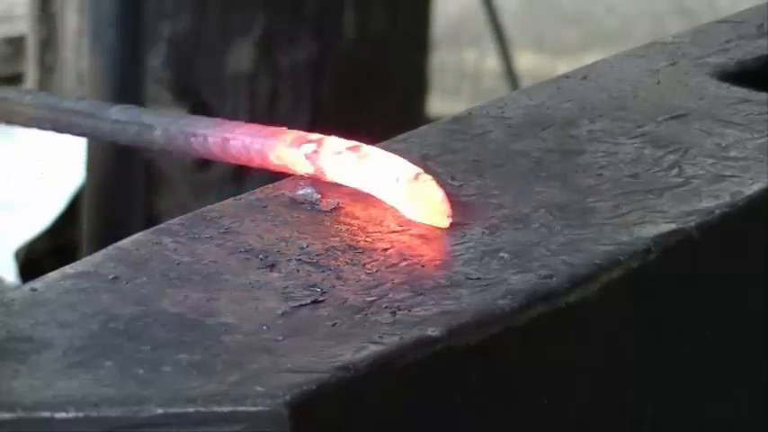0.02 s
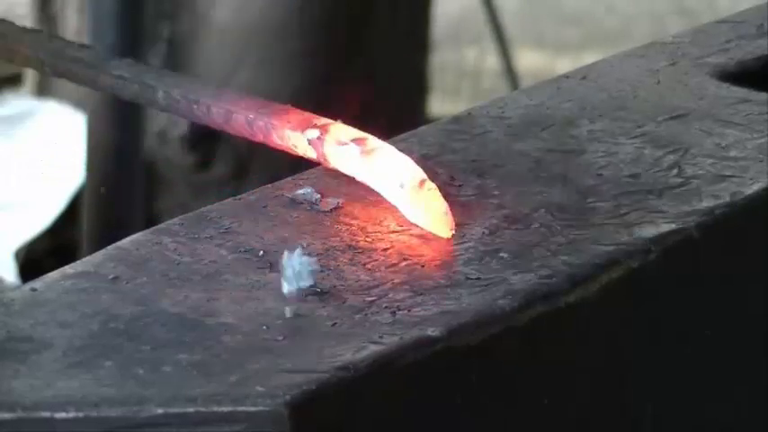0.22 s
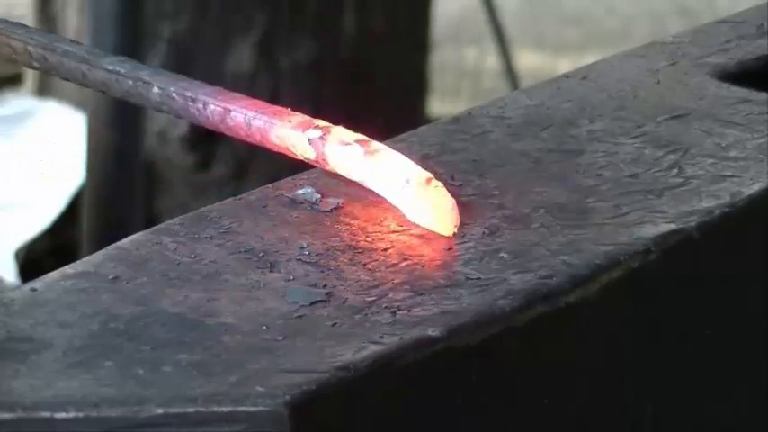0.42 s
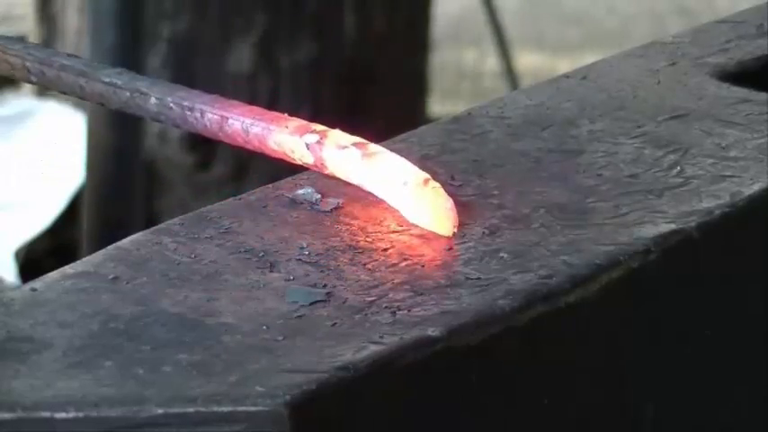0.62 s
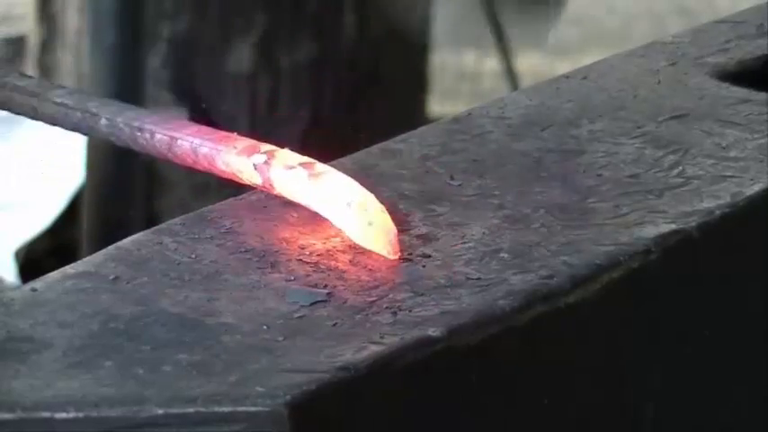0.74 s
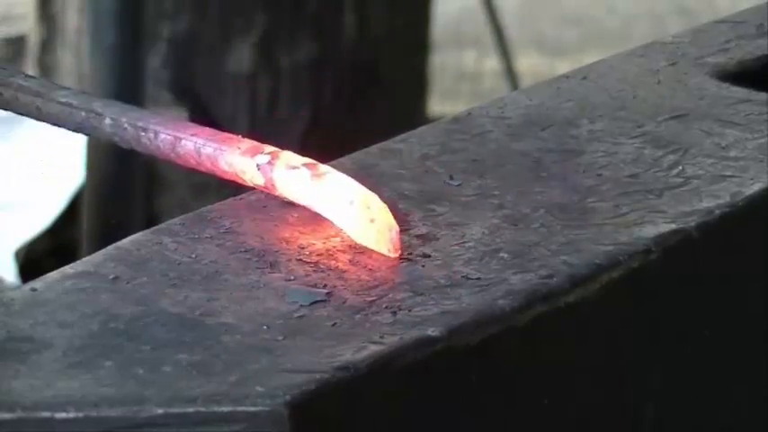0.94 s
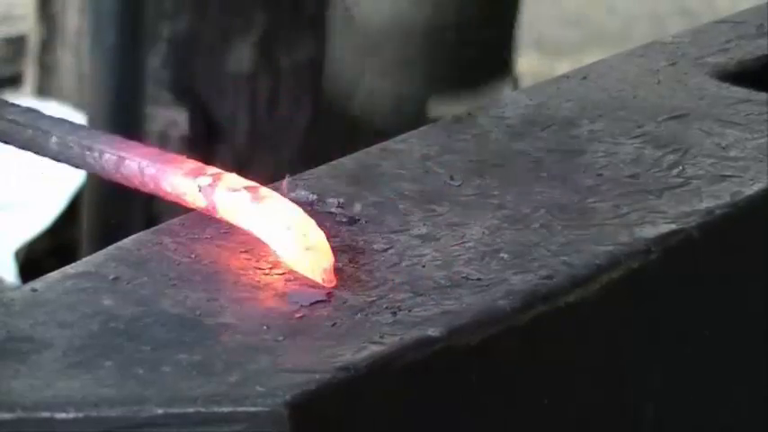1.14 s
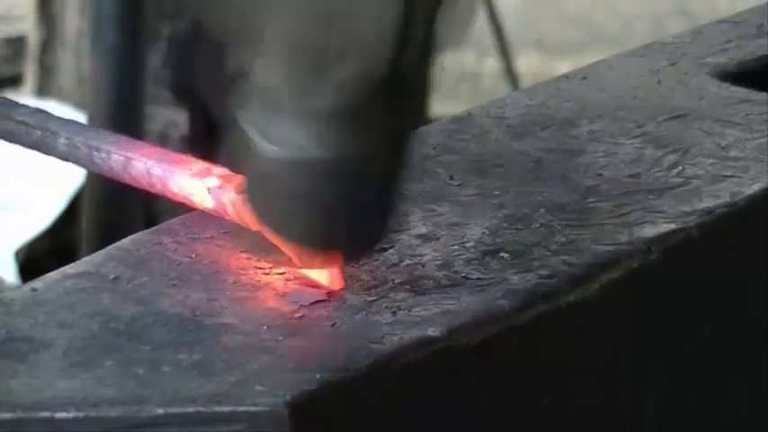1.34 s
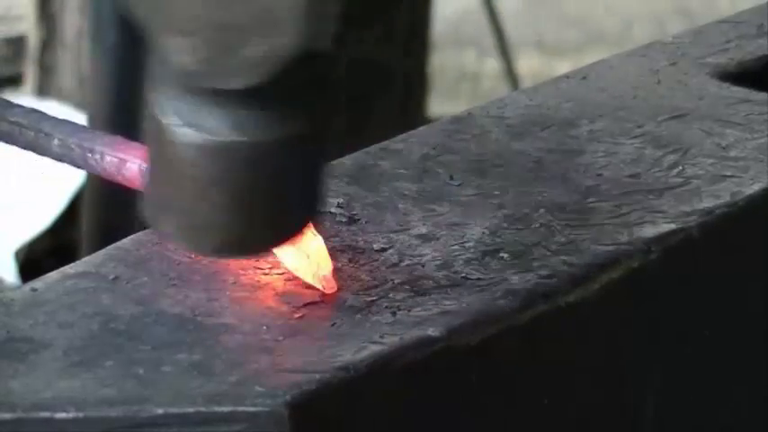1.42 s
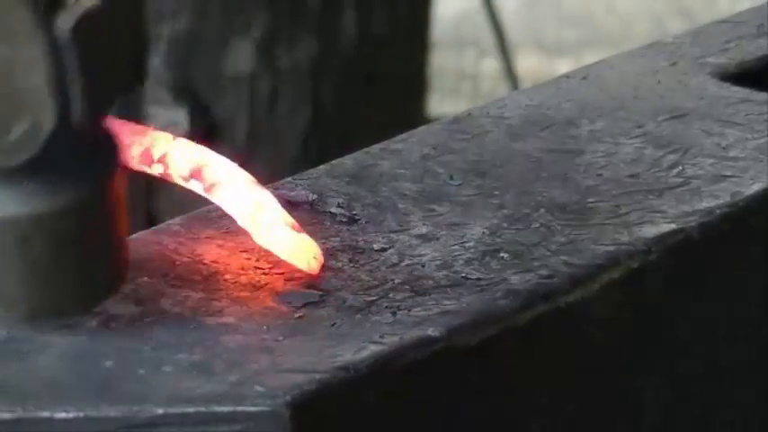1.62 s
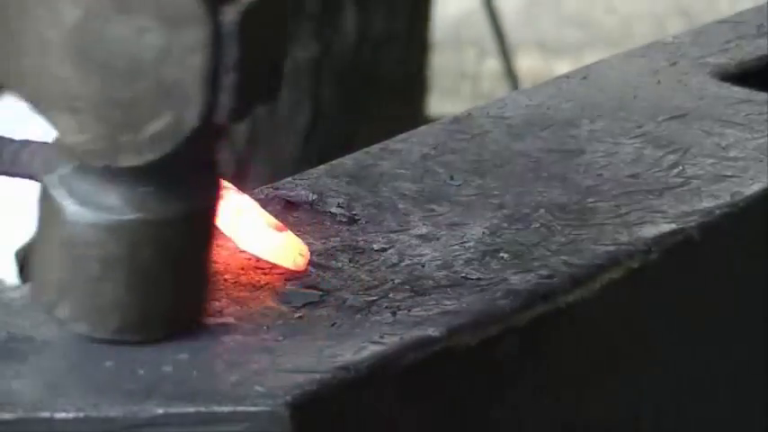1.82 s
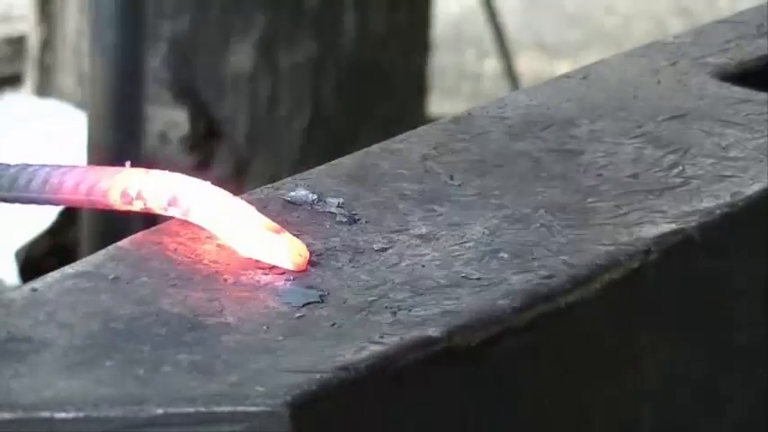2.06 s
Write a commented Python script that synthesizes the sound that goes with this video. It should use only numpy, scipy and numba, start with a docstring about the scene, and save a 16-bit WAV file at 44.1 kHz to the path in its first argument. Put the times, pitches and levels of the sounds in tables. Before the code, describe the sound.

A hammer strikes an anvil, heard close in a smithy. At 0.2 seconds it taps the bare face with a bright ring. Three dull blows land on a hot steel bar at about 0.7, 1.1 and 1.4 seconds, each followed by the bar's slight clicking. From 1.55 to 1.8 seconds the hammer drops onto the anvil and bounces quickly to rest. A forge hisses faintly throughout.

```python
"""A smithy, a stereo microphone close to the anvil, the forge hissing beside it.
A hand hammer taps the bare face, which rings long, then lands three dull blows on the soft hot bar,
which chatters against the face. Last the hammer drops on the face and bounces to rest.
The microphone's gain control pulls everything down on each hit and lets it back up."""
import sys
import numpy as np
from scipy import signal
from scipy.fft import rfft, irfft
from scipy.io import wavfile
from scipy.ndimage import uniform_filter1d
from numba import njit

SR = 44100
rng = np.random.default_rng(int(sys.argv[2]) if len(sys.argv) > 2 else 0)


def int16_out(signal):
    """Quantize to a 16-bit WAV file."""
    q = np.round(np.clip(np.atleast_2d(signal).T, -1, 1) * 32767)
    wavfile.write(sys.argv[1], SR, q.astype(np.int16))


N = 92610
T = np.arange(16384) / SR  # time within one hit, s
BANDS_HZ = 45 * 2 ** np.arange(0, 8.1, .5)


def undb(db):
    return 10 ** (np.asarray(db) / 20)


def gain_at(table, hz):
    """Amplitude from a table of f/Hz, level/dB, read along log frequency."""
    table = np.array(table)
    return undb(np.interp(np.log(np.maximum(hz, 1)), np.log(table[:, 0]), table[:, 1]))


def noise_bands(colour, width, size):
    """Coloured stereo noise in half octaves that sum to rms 1: band x channel x sample."""
    hz = np.arange(size // 2 + 1) * SR / size
    mid, side = rfft(rng.standard_normal((2, size))) * gain_at(colour, hz)
    side *= gain_at(width, hz)
    share = np.clip(1 - 2 * abs(np.log2(np.maximum(hz, 1) / BANDS_HZ[:, None])), 0, 1)
    bands = irfft(share[:, None] * np.array([mid + side, mid - side]), size)
    return bands / bands.sum(0).std()


def fade(t60, bend):
    """Decay by 60 dB in t60 s; with bend over 1 the tail dies faster towards its end."""
    return np.exp(-np.log(1000) * (T / t60) ** bend)


def add(out, sound, start_s):
    i = int(start_s * SR)
    out[:, i:i + sound.shape[1]] += sound[:, :N - i]


def drift(rate_hz):
    """Glides between random values of spread near 1."""
    hold = int(SR / rate_hz)
    return uniform_filter1d(np.repeat(rng.standard_normal(N // hold + 1), hold), hold)[:N]


def tilt(sound, db_per_octave):
    """Tilt about 2.5 kHz: a harder contact is brighter. Minimum phase keeps the attack sharp."""
    hz = np.arange(len(T) // 2 + 1) * SR / len(T)
    octaves = np.log2(np.clip(hz, 800, 12000) / 2500)
    cepstrum = irfft(np.log(undb(db_per_octave * octaves)))
    cepstrum[1:len(T) // 2] *= 2
    cepstrum[len(T) // 2:] = 0
    return irfft(rfft(sound) * np.exp(rfft(cepstrum)), len(T))


# Spectrum of the fire, and its stereo side against mid: f/Hz, level/dB
FORGE_HISS = [(30, -44), (130, -30), (190, -20.5), (300, -13), (400, -8), (600, -2), (800, -4.5),
              (1300, -7.5), (1930, -7), (2500, -11.5), (5000, -18.5), (10000, -25), (11000, -36.5)]
FORGE_WIDTH = [(60, 9), (190, -26), (400, -15.5), (1000, -21.5), (2000, -18.5), (3400, -14), (6000, -8),
               (11000, -1)]
def forge():
    """The blast of the fire behind the hits: a hiss that swells a little, each band flickering alone."""
    swell_db = -1.53 * drift(rate_hz=1.8)
    bands = noise_bands(FORGE_HISS, FORGE_WIDTH, N)
    return sum(band * undb(swell_db + 1.73 * drift(rate_hz=8.88)) for band in bands)


# Stereo side against mid of a hit at the microphone: f/Hz, level/dB
HIT_WIDTH = [(60, -8), (300, -20), (600, -24.5), (1500, -20), (3400, -13.5), (6000, -11.5), (11000, -5.5)]
def crack(colour, decay_s, rise_s=.0002):
    """The burst of noise as steel meets steel."""
    noise = noise_bands(colour, HIT_WIDTH, len(T)).sum(0)
    return noise * np.exp(-T / decay_s) * (1 - np.exp(-T / rise_s))


def clatter(colour, t60, grit_db=1.8, grit_s=.0015):
    """Dense small modes and tiny knocks of stand, tools and shed; the treble dies first."""
    band_t60 = t60 * (BANDS_HZ / 2000) ** -.065
    span = int(grit_s * SR)
    knocks = undb(grit_db * np.sqrt(span) * uniform_filter1d(rng.standard_normal(len(T)), span))
    bands = noise_bands(colour, HIT_WIDTH, len(T))
    return knocks * (bands * fade(band_t60[:, None, None], bend=1.5)).sum(0)


def ring(modes, low_db, high_db, length, split_hz=3500, waver_s=.012):
    """A steel body's modes start at once, their strength varying with each hit and each channel."""
    hz, db, t60 = np.array(modes).T[:, :, None]
    scatter_db, side_turns = rng.standard_normal((len(modes), 2)).T[:, :, None]
    # Close neighbours and echoes make each mode waver in strength and phase.
    span = int(waver_s * SR)
    noise = rng.standard_normal((2, len(modes), len(T)))
    slow = uniform_filter1d(uniform_filter1d(noise, span), span) * np.sqrt(1.5 * span)
    waver = 1 + .36 * np.minimum(T / waver_s / 2, 1) * (slow[0] + 1j * slow[1])
    strength = undb(db + np.where(hz < split_hz, low_db, high_db) + scatter_db)
    tones = strength * fade(t60 * length, bend=1.8) * np.exp(2j * np.pi * hz * T) * waver
    side = gain_at(HIT_WIDTH, hz) * np.exp(2j * np.pi * side_turns)
    return np.array([(tones * (1 + side)).sum(0).imag, (tones * (1 - side)).sum(0).imag])


# Rebounds of the bar: t/s, level/dB
REBOUNDS = [(.6998, 1), (0.7104, -21), (1.0867, -3), (1.0967, 1), (1.3888, -9.5)]
# Spectrum of one rebound: f/Hz, level/dB
REBOUND_CLICK = [(40, -60), (700, -22), (1500, -12), (3000, -10), (4300, -4), (6000, 0), (7500, -8),
                 (10000, -6), (11000, -14)]
def bar_chatter():
    """The bar clicks back against the face just after a blow."""
    out = np.zeros((2, N))
    for start, db in REBOUNDS:
        add(out, undb(db) * crack(REBOUND_CLICK, decay_s=.0014), start)
    return out


# Modes of the anvil: f/Hz, level/dB, base t60/s
ANVIL_MODES = [(1020, -9, .18), (1366, -11, .22), (1410, -10, .22), (1692, -10, .22), (1910, 0, .25),
               (2551, -11, .22), (4369, -13, .24), (4603, -17, .22), (4933, -14, .22), (5497, -8, .26),
               (5862, -15, .22), (6638, 0, .27), (7337, -16, .23), (8850, -19, .22), (10530, -19, .25)]
def anvil(low_db, high_db, length):
    """The struck anvil rings, its low and high modes driven by separate amounts."""
    return ring(ANVIL_MODES, low_db, high_db, length)


# Blows on the bar: t/s, level/dB, thump f/Hz, crack level/dB, crack lag/s, clatter level/dB,
# clatter t60/s, tilt/(dB per octave), anvil low ring/dB
HOT_BLOWS = [(.6848, 2.5, 1290, -2, 0.0013, -11.5, 0.16, 0.25, -20),
             (1.0804, -2.5, 926, 1.5, 0.0018, -7, 0.15, 1.6, -14),
             (1.3745, -2, 1320, -2.5, 0.00151, -14, 0.14, 0.5, -13)]
# Spectra of a blow's crack and clatter: f/Hz, level/dB
BLOW_CRACK = [(40, -87), (500, 5), (2000, 4.5), (3000, -10), (4500, -25), (6000, 4.5), (7500, -17),
              (9700, -6), (11000, -17)]
BLOW_CLATTER = [(40, -10), (300, -12), (940, 6.5), (1500, -3), (2000, 1), (3000, -1.5), (4300, 1.5),
                (6000, -5), (8000, -5), (11000, -14)]
# Modes of the bar: f/Hz, level/dB, base t60/s
BAR_MODES = [(620, -3, .12), (942, -3, .15), (2290, -5, .18), (2690, -7, .16), (3736, -4, .16),
             (4310, -2, .14), (5425, -8, .16), (6170, -4, .14), (7670, -9, .13), (9200, -10, .13)]
def hammer_on_bar(thump_s=.00083, bar_db=-23.5):
    """Soft hot steel takes the blow: it thumps, cracks an instant later and barely rings."""
    out = np.zeros((2, N))
    pulse = T / thump_s * np.exp(1 - T / thump_s - (T / thump_s / 2) ** 2)
    side = undb(-28) * np.array([[1], [-1]])
    for start, db, hz, crack_db, lag, clatter_db, t60, tilt_db, low_db in HOT_BLOWS:
        phase = 2 * np.pi * hz * T
        thump = -pulse * (np.sin(phase) + side * np.cos(phase))
        add(out, undb(db) * (thump + anvil(low_db, low_db - 23, length=.38)), start)
        contact = undb(crack_db) * crack(BLOW_CRACK, decay_s=.0045)
        contact += undb(clatter_db) * clatter(BLOW_CLATTER, t60)
        contact += ring(BAR_MODES, bar_db, bar_db, length=.89)
        add(out, undb(db) * tilt(contact, tilt_db), start + lag)
    return out


# Taps on the bare face: t/s, level/dB, anvil low ring/dB, anvil high ring/dB, head ring/dB,
# clatter t60/s, tilt/(dB per octave), ring length factor
FACE_TAPS = [(0.1998, 0, -12.5, -10.5, -21, 0.24, 3, 0.68), (1.5511, 1.5, -15, -22, -15.5, 0.15, 0, 0.47),
             (1.6331, 3, -9.5, -22, -10.5, 0.12, -1, 0.25),
             (1.6819, 3.5, -20, -30, -14.5, 0.069, -3.5, 0.68),
             (1.7153, -8, -5.5, -71, -39, 0.33, -3.5, 0.61), (1.7359, -8.5, -35, -35, -16, 0.14, -5.5, .5),
             (1.7533, -18, -40, -38, -19, .1, -5, 0.19)]
# Spectra of a tap's crack and clatter: f/Hz, level/dB
FACE_CRACK = [(40, -52), (400, -15), (1000, -10), (2200, -2.5), (3000, -2.5), (4500, -21), (8000, -13.5),
              (11000, -28)]
FACE_CLATTER = [(40, 4), (500, -5), (1250, -4), (1900, -0.5), (3000, -5.5), (4200, -6), (5300, -21.5),
                (6600, -17), (8300, -33), (9500, -20), (11000, -95)]
# Modes of the hammer head: f/Hz, level/dB, base t60/s
HEAD_MODES = [(2747, -2, .2), (3162, 2, .22), (3899, -12, .25), (8226, -5, .3), (8400, -18, .25),
              (9119, -24, .25)]
def hammer_on_face(touch_db=-7, touch_s=.009):
    """Hard steel on steel rings anvil and hammer head; each new touch damps the taps before it."""
    out = np.zeros((2, N))
    low_cut = signal.butter(2, 750, "high", fs=SR, output="sos")  # bare steel sends out little bass
    for start, db, low_db, high_db, head_db, t60, tilt_db, length in FACE_TAPS:
        later = [tap[0] for tap in FACE_TAPS if tap[0] > start]
        touches = sum(np.clip((T + start - when) / touch_s, 0, 1) for when in later)
        contact = crack(FACE_CRACK, decay_s=.0025) + undb(-11) * clatter(FACE_CLATTER, t60)
        contact += ring(HEAD_MODES, head_db, head_db, length)
        steel = tilt(contact, tilt_db) + anvil(low_db, high_db, length)
        add(out, undb(db) * signal.sosfilt(low_cut, steel * undb(touch_db * touches)), start)
    return out


def scene():
    """The smithy from the microphone's spot: the anvil in front, the forge well below it in level."""
    hits = hammer_on_face() + hammer_on_bar() + bar_chatter()
    return undb(3) * hits + undb(-36.5) * forge()


@njit
def follow(peaks, attack_s, release_s):
    """Level follower, quick up and slow down."""
    level, levels = 1e-4, np.empty(len(peaks))
    for i in range(len(peaks)):
        lag_s = attack_s if peaks[i] > level else release_s
        level += (peaks[i] - level) / (lag_s * SR)
        levels[i] = level
    return levels


def record(dry, threshold_db=-19, ratio=2.7):
    """A thin microphone, gain control, soft clipping of the peaks that slip past it, a cut top."""
    low_cut = signal.butter(2, 148, "high", fs=SR, output="sos")
    top_cut = signal.ellip(12, .2, 90, 11150, fs=SR, output="sos")
    thin = signal.sosfilt(low_cut, dry)
    level = follow(abs(thin).max(0), attack_s=.0044, release_s=.045)
    gain = np.minimum(undb(threshold_db) / level, 1) ** (1 - 1 / ratio)
    return signal.sosfilt(top_cut, np.tanh(thin * gain))


dry = scene()
out = record(dry)
int16_out(out)
```